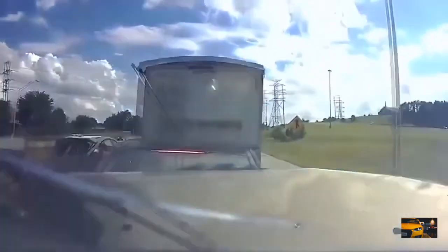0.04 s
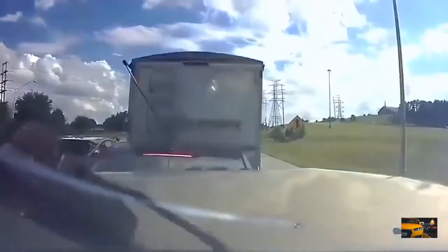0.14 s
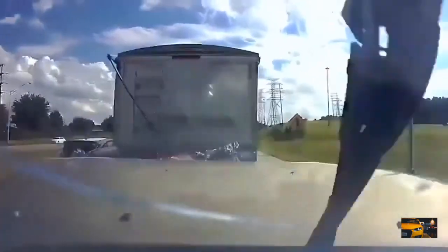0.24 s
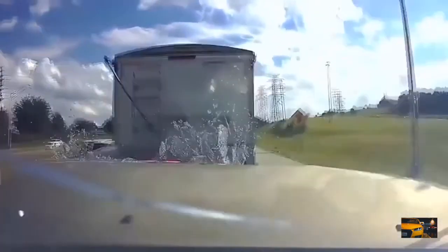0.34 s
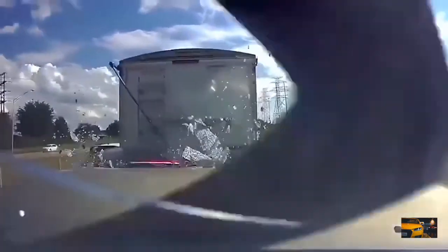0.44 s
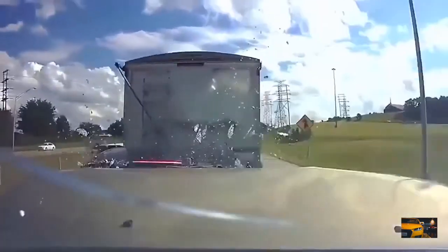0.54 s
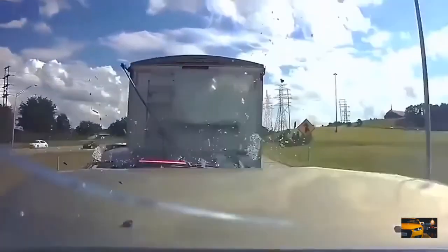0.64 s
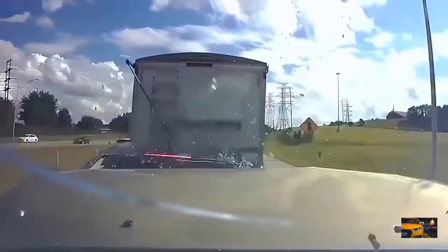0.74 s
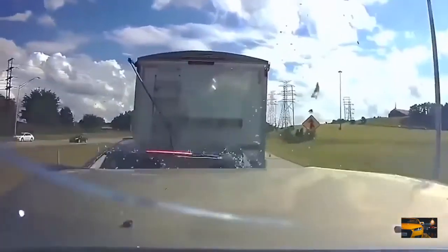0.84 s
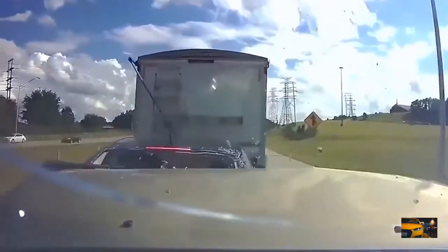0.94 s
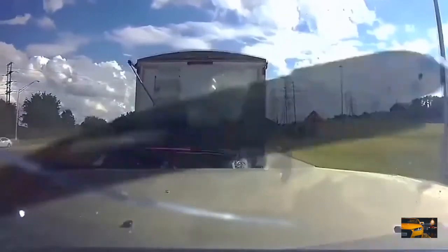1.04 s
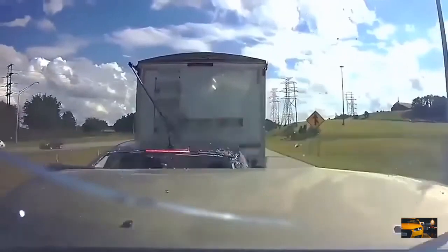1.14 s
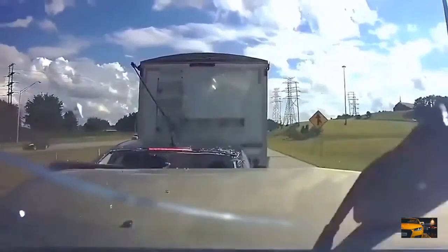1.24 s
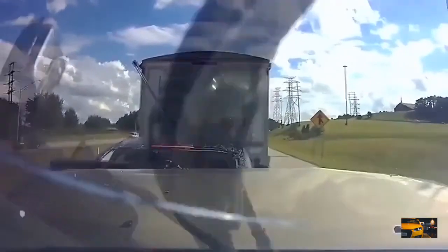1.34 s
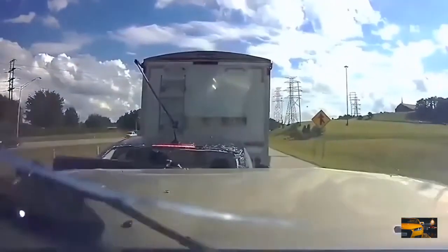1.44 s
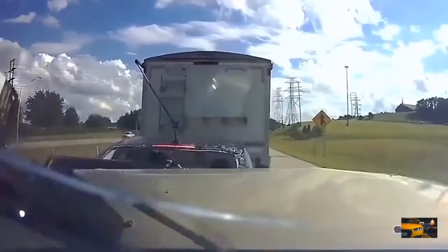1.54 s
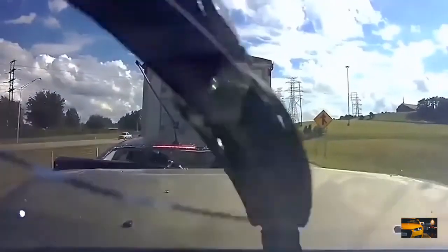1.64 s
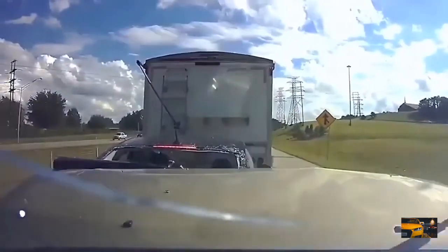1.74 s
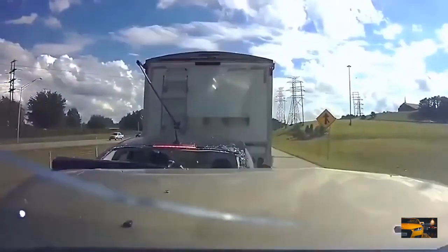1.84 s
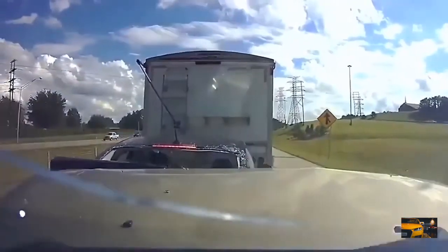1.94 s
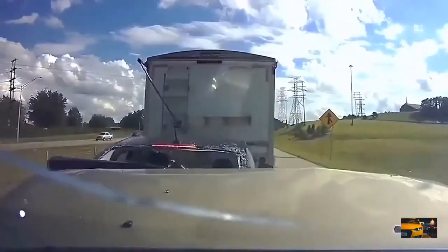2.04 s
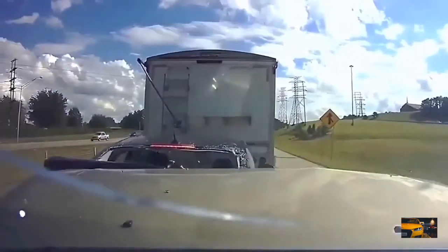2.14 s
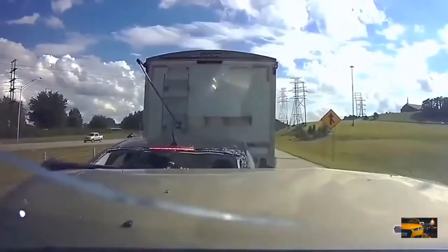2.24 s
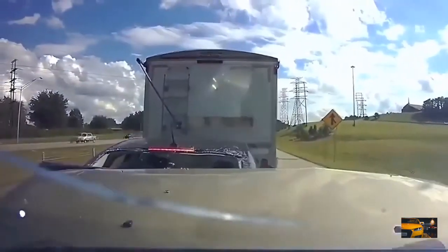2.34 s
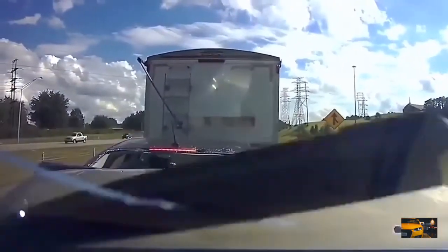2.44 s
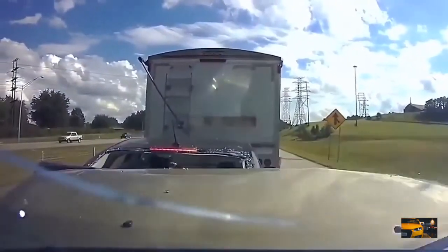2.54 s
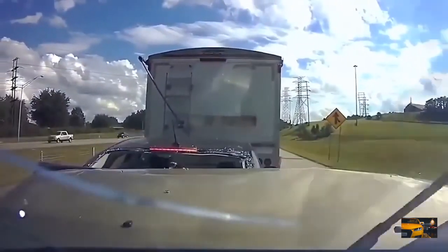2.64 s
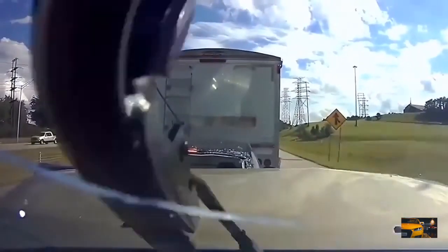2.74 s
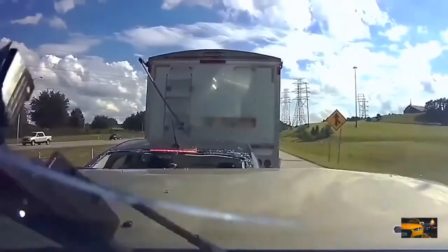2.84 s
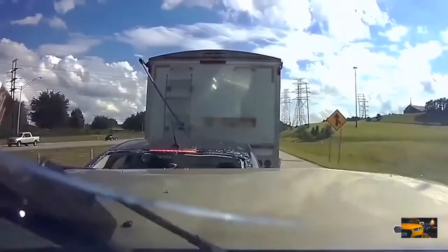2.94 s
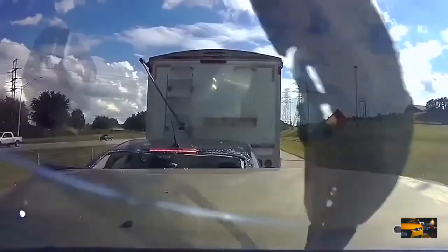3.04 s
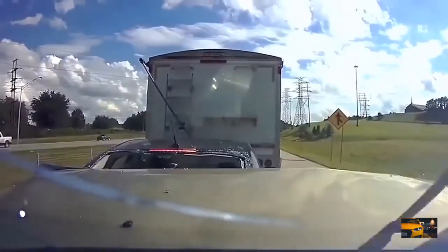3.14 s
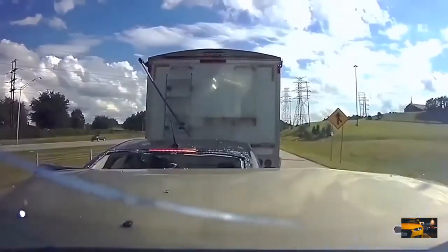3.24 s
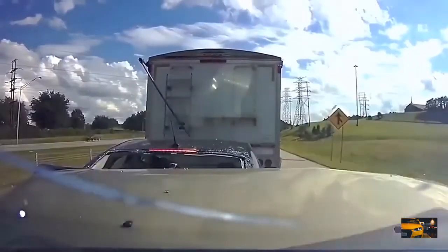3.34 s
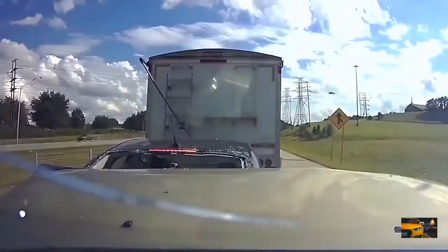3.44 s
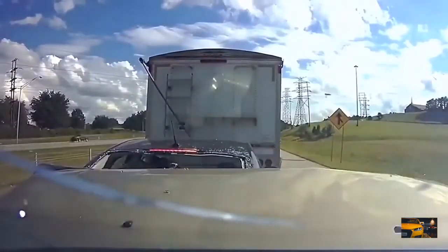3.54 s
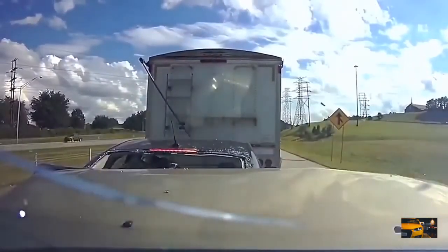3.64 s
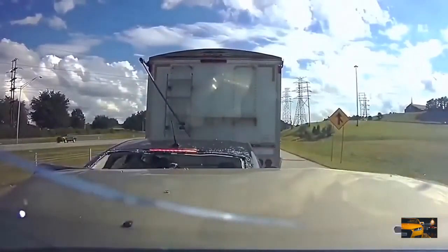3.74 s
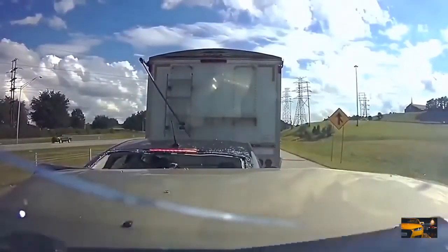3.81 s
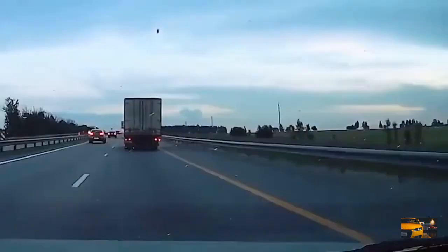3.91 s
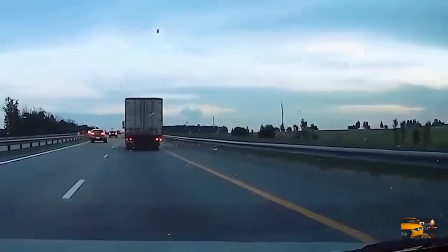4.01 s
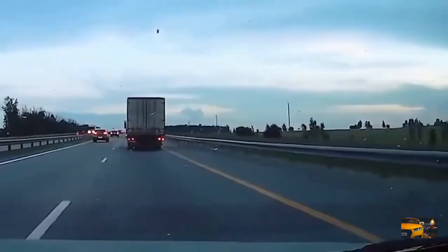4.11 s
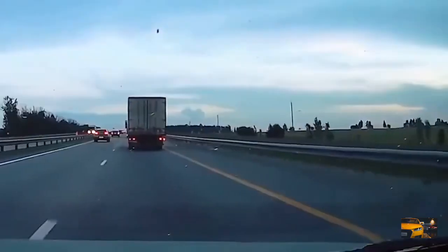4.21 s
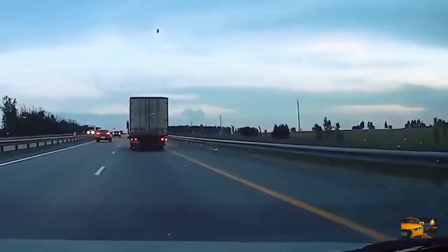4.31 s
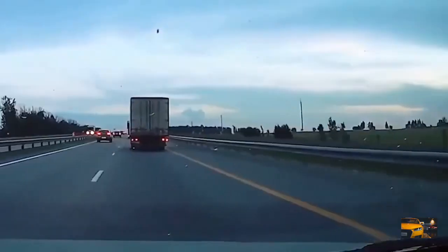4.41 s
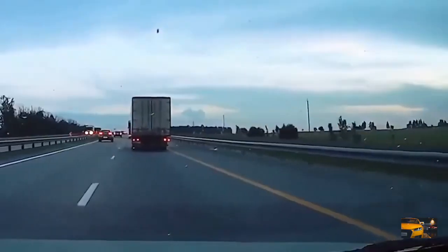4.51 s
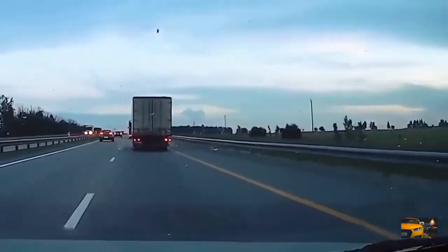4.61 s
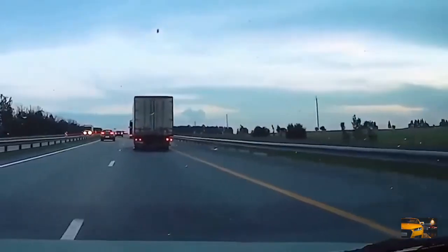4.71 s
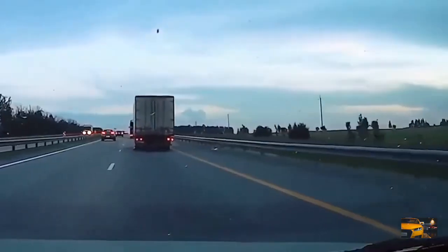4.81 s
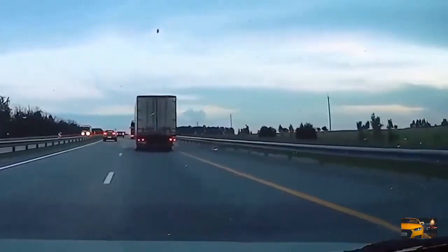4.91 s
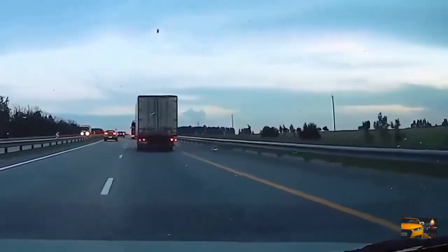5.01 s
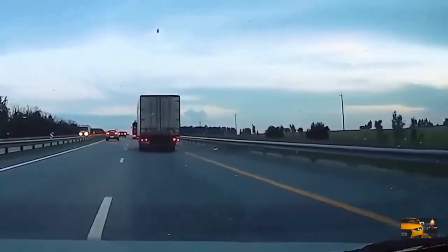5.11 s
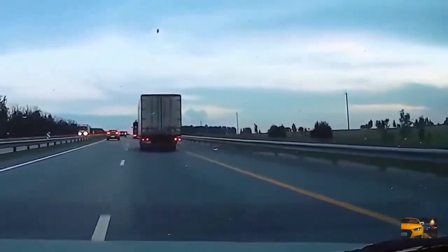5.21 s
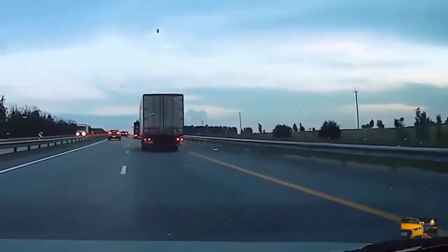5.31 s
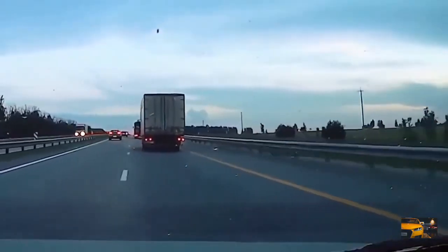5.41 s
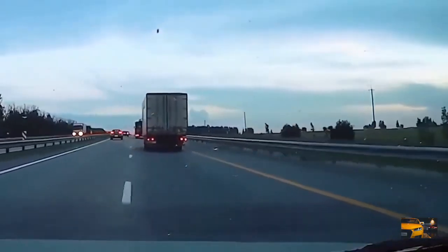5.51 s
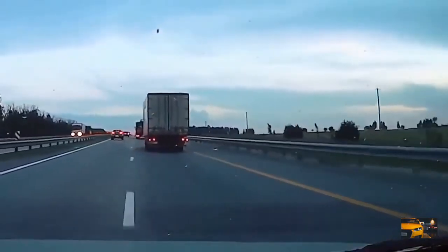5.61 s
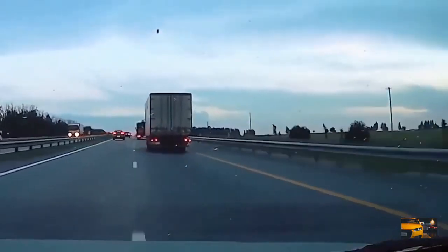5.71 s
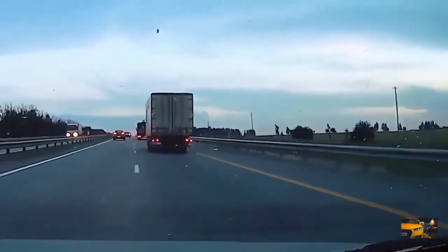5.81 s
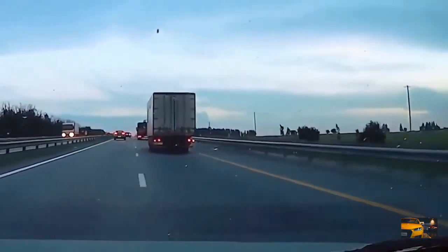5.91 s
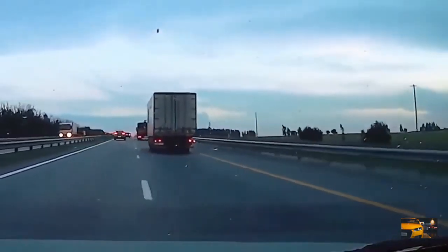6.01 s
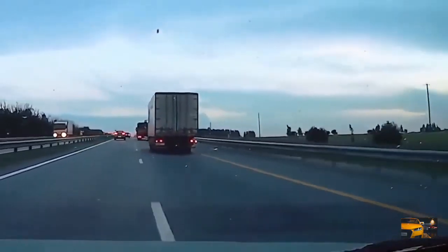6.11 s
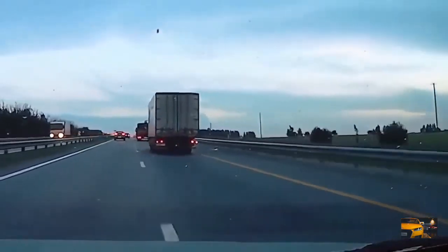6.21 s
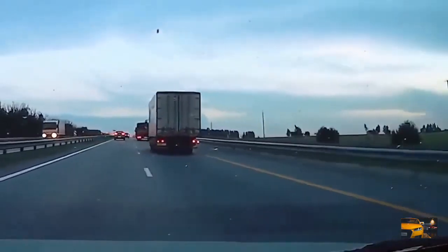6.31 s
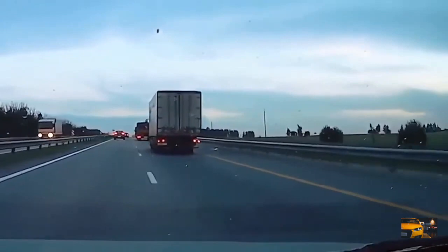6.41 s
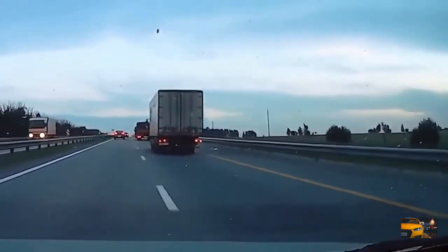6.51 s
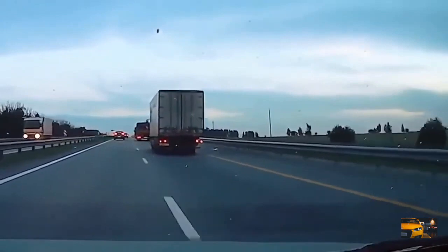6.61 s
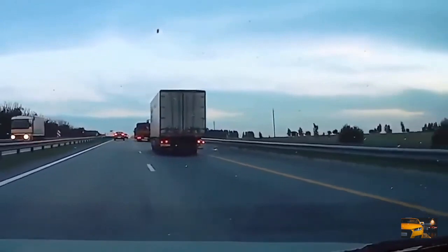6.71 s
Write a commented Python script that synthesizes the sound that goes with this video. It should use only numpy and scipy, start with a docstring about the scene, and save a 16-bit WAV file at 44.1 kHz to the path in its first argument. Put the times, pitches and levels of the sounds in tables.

```python
"""Tyres chirp, with a high partial above, in a shaking truck cab as it rams a car into the trailer ahead.
Panels crumple as patchy noise with ringing fractures, metal groans by stick-slip and squeals, glass sprays
as patchy bright noise with faint tiny rings, and the microphone overloads. Struck modes make bits settle
over the running engine's hum. A second scene then follows at once: a car cruises on a highway, with coloured
noise for tyre roar and air, wandering tones for the drone, and damped modes for the ticking trim."""
import sys
import numpy as np
from scipy import signal
from scipy.fft import rfft, irfft, next_fast_len
from scipy.io import wavfile
from scipy.ndimage import uniform_filter1d, map_coordinates

SR = 44100
rng = np.random.default_rng(int(sys.argv[2]) if len(sys.argv) > 2 else 0)


def waveform_to_disk(signal):
    """Save audio, clipped to [-1, 1], as 16-bit WAV at the path in sys.argv[1]."""
    frames = np.transpose(np.atleast_2d(signal))
    scaled = np.clip(frames, -1, 1) * 32767
    samples = np.round(scaled).astype(np.int16)
    wavfile.write(sys.argv[1], SR, samples)


N = 297734

CUT_S = 4.043  # the crash scene gives way to the highway scene
CAB_TOP_HZ, TOP_HZ = 7450, 15030  # upper band limits of the cab microphone and of the whole output
CEILING = .295  # amplitude at which the cab microphone overloads

# Highway: tyre roar spectrum. Each row: frequency in Hz, relative level in dB per Hz.
ROAD_SPECTRUM = [(11, -36), (18, -18), (27, -27), (53, -15), (70, -4.5), (130, -6), (219, -10), (318, -6.5),
                 (391, -12), (462, -8.5), (645, -15), (998, -14.5), (1150, -17.5), (2030, -24), (2600, -50),
                 (3380, -65), (5720, -120)]
# Air hiss spectrum. Each row: frequency in Hz, relative level in dB per Hz.
AIR_SPECTRUM = [(1300, -35), (2200, -3), (3000, -7.5), (3500, -11), (4600, -15.5), (5500, -16.5),
                (6800, -11), (7500, -20), (8500, -26.5), (10000, -29.5), (15000, -30.5)]
# Resonances of tyres and body. Each row: frequency in Hz, width in Hz, strength in dB.
TYRE_RESONANCES = [(139.6, 14, 6), (282, 67, 1), (990, 13, 2.5)]
# Tyre roar as the road surface changes. Each row: time in seconds, level in dB.
CRUISE_LEVELS = [(4.05, -36), (4.6, -36), (5.4, -35.5), (6.1, -36.5), (6.75, -35.5)]
HISS_DB = -25.5  # air hiss against the tyre roar
# Drone of engine and tyres. Each row: frequency in Hz, rms level in dB.
DRONE_TONES = [(39, -48.5), (78, -46.5), (194, -52), (233, -63.5), (292, -46.5), (322, -45)]
# Ticks of the dashboard trim. Each row: start in seconds, level in dB.
TRIM_TICKS = [(4.106, -54.5), (4.458, -57.5), (4.922, -47.5), (5.146, -54), (5.594, -57), (5.606, -44),
              (5.612, -45)]
# Noise spectrum of a trim tick. Each row: frequency in Hz, relative level in dB per Hz.
TICK_SPECTRUM = [(1200, -15), (2300, -4.5), (4000, -11.5), (6200, -1), (7300, -3.5), (9000, -16),
                 (15000, -32)]
# Ringing modes of the trim. Each row: frequency in Hz, level in dB, t60 in seconds.
TRIM_MODES = [(2315, -6, .075), (6080, -5, .056), (6530, -5, .059), (7120, -9, .054)]
CHATTER_PER_S, CHATTER_DB = 12, -57  # small plastic parts: ticks a second, greatest nominal level
# Modes of the chattering parts. Each row: frequency in Hz, level in dB, t60 in seconds.
CHATTER_MODES = [(6750, 0, .012), (7250, -1, .012)]

# Engine in the cab. Each row: frequency in Hz, rms level in dB.
ENGINE_TONES = [(57, -41.5)]
# A higher hum of the engine, before its fade-in. Each row: frequency in Hz, rms level in dB.
ENGINE_HUM_TONES = [(209, -56)]
# Rattling cab spectrum. Each row: frequency in Hz, relative level in dB per Hz.
RATTLE_SPECTRUM = [(35, -51), (60, -13), (86, -6.5), (178, -11), (215, -13), (340, -21), (380, -17.5),
                   (474, -26.5), (609, -22), (772, -22), (933, -22), (1080, -26.5), (1450, -29.5),
                   (1620, -38), (2600, -47), (3380, -56), (5720, -120)]
# Rustle of loose things. Each row: frequency in Hz, relative level in dB per Hz.
RUSTLE_SPECTRUM = [(1120, -38.5), (1900, -13), (2180, 2.5), (2570, -10.5), (2830, -2.5), (3210, -6.5),
                   (3490, -10), (4410, -15.5), (4970, -18.5), (5630, -16), (7400, -34), (9620, -56),
                   (16300, -120)]
RUSTLE_DB = -63  # before the cab's fade-in
# Hollow resonances of the cab. Each row: frequency in Hz, width in Hz, strength in dB.
HOLLOWS = [(375, 50, 1.5), (855, 150, -7.5), (1330, 11, 4), (1497, 37, 10), (2096, 100, 10.5),
           (2950, 250, -11)]
# The cab sways on its springs. Each row: start in seconds, length in seconds, level in dB.
SWAYS = [(1.8, 0.06, -36), (2.13, 0.029, -37), (2.48, 0.14, -35.5), (2.75, 0.021, -38), (3.17, 0.05, -31)]
SWAY_RISE_DB_PER_S, SWAY_FALL_DB_PER_S, RUMBLE_DB = 108, 66, -44
# Hollow booms in the cab. Each row: start in seconds, length in seconds, level in dB.
BOOMS = [(2.29, .04, -42.5), (2.6, .026, -45.5), (2.83, .06, -42), (3.12, .06, -46), (3.48, .09, -46.5)]
BOOM_RISE_DB_PER_S, BOOM_FALL_DB_PER_S = 117, 76
# The rattle fades from the end of the crash, and swinging objects stir it up again for a while
CALM_S, RATTLE_DB, RATTLE_FALL_DB_PER_S = 1.5, -44.5, 1.1
STIR_S, STIR_HOLD_S, STIR_DB, STIR_RISE_DB_PER_S, STIR_FALL_DB_PER_S = 2.71, 0.52, -53, 41, 26
# A thin drone comes and goes. Each row: start in seconds, length in seconds, level in dB before
# the cab's fade-in, then start, middle and end pitch in Hz.
WHINES = [(1.45, .52, -50, 408, 383, 388), (1.95, .3, -52, 392, 372, 362),
          (2.33, .35, -48.5, 382, 387, 378), (2.6, .58, -50.5, 368, 373, 357)]

# Things slide over the dashboard. Each row: time at full speed in seconds, length in seconds, level in dB.
SLIDES = [(2.21, .02, -64), (2.95, .06, -51.5), (3.55, .02, -62)]
SLIDE_RISE_DB_PER_S, SLIDE_FALL_DB_PER_S = 80, 95
# Sliding spectrum. Each row: frequency in Hz, relative level in dB per Hz.
DASH_SPECTRUM = [(500, -20), (860, 2), (1150, -1), (1470, 1), (1800, -10), (2400, -3), (2850, -4),
                 (3400, -12), (4000, -11.5), (4700, -15), (6000, -20), (7400, -26)]
# Sliding resonance before and after its climb. Each row: frequency in Hz, width in Hz, strength in dB.
SLIDE_RING = [(2410, 100, 6), (2790, 110, 3)]
SLIDE_CLIMB_S = (2.95, 2.99)  # start and end of the climb

# Knocks in the cab. Each row: start in seconds, thud level in dB, thud pitch in Hz, clack in dB over the thud.
KNOCKS = [(1.515, -36, 160, -13), (1.969, -34, 318, -15), (2.59, -35, 120, -16), (2.623, -33.5, 260, -8),
          (3.118, -34, 235, -20), (3.193, -48, 220, -3)]
# Modes of the struck dashboard. Each row: frequency in Hz, level in dB, t60 in seconds.
DASH_MODES = [(373, -1, 0.2), (576, -5.5, 0.22), (912, 6, .13), (1196, 1, 0.13), (1360, 1, 0.22),
              (1500, -16, 0.19), (2130, -13, .16), (2770, -8, 0.18), (3100, -12.5, 0.21)]
# Landing fragments. Each row: start in seconds, tap level in dB, bright tick in dB over the tap.
BITS = [(1.336, -45, 1), (1.530, -42, 3), (1.558, -52, 2), (1.613, -53, 6), (1.688, -57, 1),
        (1.745, -45, 5), (1.791, -58, 2), (1.831, -58, 3), (1.874, -52, -6), (1.927, -52, -6),
        (1.964, -57, 0), (2.092, -56, -8), (2.199, -59, 3), (2.243, -59, 1), (2.571, -52, -15),
        (3.052, -59, 9), (3.09, -62, 3), (3.192, -46.5, -9), (3.287, -66, 5), (3.538, -62, 4),
        (3.57, -61, -2)]
# Modes of a landing fragment. Each row: frequency in Hz, level in dB, t60 in seconds.
BIT_MODES = [(2780, 0, .06), (3170, 2, .15), (4730, -5, .06), (5860, -3, .09), (6150, -8, .045)]
# Resonances of the fragments. Each row: frequency in Hz, width in Hz, strength in dB.
BIT_RING = [(2800, 90, 1), (3100, 90, -4), (5840, 160, -4.5)]
TRICKLE_DB, TRICKLE_FALL_DB_PER_S = -57, 27  # glass crumbs: steady until CALM_S, then ever fainter

# Squeals: a tyre chirp's high partial, then steel on steel. Each row: start in seconds, length in seconds,
# level in dB, pitch in Hz.
SQUEALS = [(.04, .24, -54, 2170), (.642, .07, -39.5, 2043), (.643, .028, -43, 5437),
           (.643, .028, -43, 5728), (.682, .028, -44, 4820), (.672, .025, -47, 3790),
           (.918, .08, -38, 2054), (1.0, .08, -46, 2062), (.96, .045, -45.5, 3252), (1.045, .04, -46, 3242),
           (.965, .125, -49.5, 5230)]
# Bending metal groans. Each row: start and length in seconds, level in dB, start, middle and end pitch in Hz.
GROANS = [(.72, .03, -22, 345, 385, 425), (.745, .05, -29, 470, 495, 500), (.945, .07, -30, 360, 410, 345),
          (1.185, .08, -29.5, 375, 415, 405), (1.262, .04, -37, 395, 398, 396),
          (1.57, .2, -49, 640, 632, 595)]
# Metal rasps. Each row: start and length in seconds, level in dB, start, middle and end pitch in Hz.
SCRAPES = [(.972, .14, -30, 300, 385, 290)]
# A bending panel's resonance glides. Each row: start and length in seconds, level in dB, start, middle
# and end pitch in Hz.
BENDS = [(.533, .025, -24, 1180, 1070, 1030), (.563, .028, -25, 850, 950, 1070),
         (.898, .028, -34, 1450, 1400, 1310), (.938, .037, -33, 1150, 850, 760),
         (.982, .03, -31, 660, 675, 720), (1.012, .11, -33, 830, 880, 810),
         (1.019, .048, -29, 1175, 1205, 1160), (1.067, .025, -33, 1410, 1350, 1280),
         (1.193, .028, -34, 940, 980, 1010)]
# Tyres chirp. Each row: start and length in seconds, level in dB, start, middle and end pitch in Hz.
CHIRPS = [(.052, .058, -35, 955, 948, 958), (.115, .075, -39, 950, 964, 972),
          (.17, .075, -35, 962, 942, 935), (1.325, .109, -41, 966, 972, 945),
          (2.03, .069, -46, 927, 930, 935)]

# Jolts rock the cab. Each row: start in seconds, level in dB, frequency in Hz, hold in seconds.
JOLTS = [(.107, -15, 33, .015), (.2, -21, 36, .02), (.412, -9, 31, .03), (.446, -15, 88, .035),
         (.510, -7, 39, .018), (.583, -7, 39, .032), (.950, -16, 125, .018)]
JOLT_FALL_DB_PER_S = 800
# Buckling panels. Each row: start in seconds, crunch level in dB, boom in dB over it, crack in dB over it,
# t60 of crunch and crack in seconds.
BLOWS = [(.135, -47, 22, -10, .22), (.29, -35, -6, -14, .06), (.383, -27, -3, -24, .06),
         (.444, -18, -6, -24, .1), (.459, -24, -2, -9, .07), (.482, -27, -3, -5, .09),
         (.493, -22, -10, -14, .06), (.503, -27, -6, -7, .07), (.516, -22, -8, -8, .06),
         (.539, -17, -13, -10, .14), (.556, -19, -12, -16, .08), (.569, -24, -12, -4, .1),
         (.606, -26, -10, -7, .05), (.62, -29, -10, -6, .07), (.657, -25, -14, -10, .09),
         (.685, -23, -10, -12, .06), (.707, -16, -10, -8, .11), (.727, -17, -18, -17, .13),
         (.79, -33, -10, -1, .07), (.814, -32, -10, -2, .06), (.948, -33, 9, -5, .2),
         (1.001, -25, -8, -12, .07), (1.032, -26, -14, -12, .08), (1.106, -38, -10, 3, .04),
         (1.14, -34, -2, -7, .15), (1.203, -27, -11, -16, .14), (1.232, -26, -9, -14, .09),
         (1.255, -32, -14, -14, .07), (1.396, -33, -20, -14, .1)]

# The car folds in stages. Each row: start in seconds, length in seconds, then level in dB of crumpling panels,
# spraying glass and flexing shell.
FOLDS = [(-0.01, 0.23, -41, -44, -32), (0.418, .04, -38.5, -52, -37.5), (0.472, 0.059, -28, -34.5, -19),
         (0.664, 0.042, -33, -36.5, -28), (0.792, 0.044, -39, -42.5, -38.5),
         (0.925, 0.091, -39, -38.5, -29.5), (1.11, 0.11, -40, -41.5, -35.5), (1.355, 0.032, -45, -61, -48)]
FOLD_RISE_DB_PER_S, FOLD_FALL_DB_PER_S = 172.5, 62
GLASS_RISE_DB_PER_S, GLASS_FALL_DB_PER_S, GLASS_LAG_S = 206, 78, 0.017
SHELL_RISE_DB_PER_S, SHELL_FALL_DB_PER_S, SHELL_LEAD_S = 129.5, 112.5, 0.032
# The cab shakes hardest at the main impact
SHAKE_S, SHAKE_HOLD_S, SHAKE_DB, SHAKE_RISE_DB_PER_S, SHAKE_FALL_DB_PER_S = 0.59, 0.062, -20, 11.5, 29
# Shaking cab spectrum. Each row: frequency in Hz, relative level in dB per Hz.
SHAKE_SPECTRUM = [(9, -35), (15, -6.5), (30, -7), (42, 2.5), (55, -1), (75, -8), (110, -10), (200, -36),
                  (350, -88)]
# Flexing body shell spectrum. Each row: frequency in Hz, relative level in dB per Hz.
SHELL_SPECTRUM = [(60, -22), (100, -5), (160, -3), (250, -5), (330, -14.5), (500, -21.5), (900, -34.5),
                  (2000, -60.5)]
# Crumpling panel spectrum. Each row: frequency in Hz, relative level in dB per Hz.
PANEL_SPECTRUM = [(150, -44.5), (300, -11), (400, -0.5), (560, 0), (650, 3), (830, 1), (1050, 0.5),
                  (1370, 0), (1640, -16.5), (2100, -16.5), (2600, -19), (3400, -42)]
# Snaps of metal and plastic. Each row: frequency in Hz, relative level in dB per Hz.
SNAP_SPECTRUM = [(200, -29.5), (450, -6), (900, 8.5), (1400, 1.5), (1750, -15.5), (2200, -7.5), (3200, -14),
                 (4000, -29.5), (6000, -9.5), (7400, -18.5)]
SNAP_DB = -8  # snaps against the panels
# Spraying glass spectrum. Each row: frequency in Hz, relative level in dB per Hz.
GLASS_SPECTRUM = [(1120, -9), (1900, -3), (2100, 1.5), (2530, -6), (3280, -5), (3570, -11.5), (3850, -10),
                  (4560, -12), (4690, -11.5), (5570, -9.5), (7400, -20.5), (9620, -45.5), (16300, -120)]


def amp(db):
    """Amplitude ratio: 20 dB for each factor of ten."""
    return 10 ** (np.asarray(db) / 20)


def unit(x):
    """Normalization by mean power: scale to rms 1."""
    return x / np.sqrt(np.mean(x ** 2) + 1e-20)


def clock(seconds):
    """Uniform sampling: the sample times of a stretch."""
    return np.arange(int(seconds * SR)) / SR


def add(track, s, sound):
    """Superposition: mix a sound in at time s."""
    part = track[max(0, round(s * SR)):][:len(sound)]
    part += sound[:len(part)]


def ramp(start, end):
    """Linear growth from 0 to 1 between two times."""
    return np.clip((np.arange(N) / SR - start) / max(end - start, 1 / SR), 0, 1)


def surge(s, length, rise, fall):
    """Exponential growth and decay about a hold at gain 1 from time s; slopes in dB per second."""
    t = np.arange(N) / SR - s
    return amp(rise * np.minimum(t, 0) - fall * np.maximum(t - length, 0))


def surges(rows, rise, fall):
    """Power addition: the joint gain of overlapping (start s, length s, dB) surges."""
    return np.sqrt(sum((amp(db) * surge(s, length, rise, fall)) ** 2 for s, length, db in rows))


def swell(length, edge):
    """Tapered stroke: fades in and out over a share of its length."""
    return signal.windows.tukey(int(length * SR), np.clip(edge, 0, 1))


def wobble(rate, size=N):
    """Slow random fluctuation: a smooth curve through random knots, rate a second."""
    knots = rng.standard_normal(int(size * rate / SR) + 4)
    return map_coordinates(knots, [np.arange(size) * rate / SR])


def filtered(x, response):
    """Linear filtering: multiply the spectrum of x by a response of frequency."""
    size = next_fast_len(len(x) + SR // 4)
    return irfft(rfft(x, size) * response(np.fft.rfftfreq(size, 1 / SR)), size)[:len(x)]


def colour(x, points, peaks=()):
    """Spectral shaping: x takes a (Hz, dB) slope with second-order resonances on top; rms 1."""
    hz, db = np.transpose(points)

    def response(f):
        slope = amp(np.interp(np.log(f + 1), np.log(hz), db))
        resonance = 1 + sum(amp(g) * 1j * f * w / (c * c - f * f + 1j * f * w) for c, w, g in peaks)
        return slope * resonance

    return unit(filtered(x, response))


def rush(patchy_db, size=N):
    """Modulated turbulence: noise whose strength drifts in patches of time and pitch."""
    z = signal.stft(rng.standard_normal(size), nperseg=1024)[2]
    field = uniform_filter1d(rng.standard_normal(z.shape), size=5, axis=0)
    field = uniform_filter1d(field, size=5, axis=1)
    return unit(signal.istft(z * amp(patchy_db * unit(field)))[1][:size])


def shards(rate, spread_db, t60, low_hz, high_hz):
    """Random fracture: a hail of small breaks until CUT_S, each ringing briefly at its own pitch."""
    t = clock(.035)
    when, pitch, size, life = rng.random((int(rate * CUT_S), 4)).T[:, :, None]
    hz = low_hz + (high_hz - low_hz) * pitch
    decay_db = -60 * t / (t60 * (.5 + life))  # each life is 0.5 to 1.5 times t60
    rings = amp(spread_db * size ** 3 + decay_db) * np.sin(2 * np.pi * hz * t)
    index = (when * CUT_S * SR).astype(int) + np.arange(len(t))
    return unit(np.bincount(index.ravel(), rings.ravel(), N)[:N])


def burst(points, t60, attack, peaks=()):
    """Heavily damped impact: coloured noise that dies away exponentially."""
    t = clock(.4)
    noise = colour(rng.standard_normal(len(t)), points, peaks)
    return noise * amp(-60 * t / t60) * (1 - np.exp(-t / attack))


def ring(modes, scatter_db=2, attack=0.00054):
    """Modal vibration: damped sines, a little different in pitch and level at every blow."""
    t = clock(.4)
    tones = 0
    for hz, db, t60 in modes:
        decay = amp(db + rng.normal(0, scatter_db) - 60 * t / t60)
        tones = tones + decay * np.sin(2 * np.pi * hz * (1 + rng.normal(0, .01)) * t)
    return tones * (1 - np.exp(-t / attack))


def stick_slip(rows, overtones_db, jitter, rough_db):
    """Stick-slip friction: an unsteady slip rate glides through three pitches, with harmonics."""
    out = np.zeros(N)
    for s, length, db, *hz in rows:
        stroke = swell(length, edge=0.84)
        size = len(stroke)
        pitch = np.polyval(np.polyfit([0, .5, 1], hz, 2), np.linspace(0, 1, size))
        phase = 2 * np.pi * np.cumsum(pitch * (1 + jitter * wobble(300, size))) / SR
        tone = 0
        for k, overtone_db in enumerate(overtones_db, 1):
            tone = tone + amp(overtone_db + rough_db * wobble(144, size)) * np.sin(k * phase)
        add(out, s, amp(db) * stroke * unit(tone))
    return out


def hum(lines, drift, waver_db, rate):
    """Periodic excitation: machine tones that wander a little in pitch and strength."""
    out = np.zeros(N)
    for hz, db in lines:
        strength = amp(waver_db * wobble(rate))
        phase = 2 * np.pi * np.cumsum(hz * (1 + drift * wobble(rate))) / SR
        out += amp(db) * unit(strength * np.sin(phase))
    return out


def highway():
    """Broadband rolling noise through body resonances, with engine drone, air hiss and modal trim ticks."""
    surface = amp(np.interp(np.arange(N) / SR, *np.transpose(CRUISE_LEVELS)))
    roar = colour(rush(patchy_db=0.76), ROAD_SPECTRUM, TYRE_RESONANCES)
    hiss = amp(HISS_DB) * colour(rush(patchy_db=1.2), AIR_SPECTRUM)
    out = surface * (roar + hiss)
    for s, db in TRIM_TICKS:
        tick = burst(TICK_SPECTRUM, t60=0.042, attack=0.00039) + ring(TRIM_MODES)
        add(out, s, amp(db) * tick)
    span = N / SR - CUT_S
    # chatter falls at random times, up to 10 dB below its nominal level
    for when, size_db in rng.random((int(CHATTER_PER_S * span), 2)) * [span, -10]:
        add(out, CUT_S + when, amp(CHATTER_DB + size_db) * ring(CHATTER_MODES))
    return out + hum(DRONE_TONES, drift=0.00794, waver_db=3.0, rate=9)


def cab():
    """Forced and resonant vibration: the engine runs on while the cab sways, booms, whines and rattles."""
    rock = np.hypot(amp(RUMBLE_DB), surges(SWAYS, SWAY_RISE_DB_PER_S, SWAY_FALL_DB_PER_S))
    stir = amp(STIR_DB) * surge(STIR_S, STIR_HOLD_S, STIR_RISE_DB_PER_S, STIR_FALL_DB_PER_S)
    rattle = np.hypot(stir, amp(RATTLE_DB) * surge(CALM_S, 0, 0, RATTLE_FALL_DB_PER_S))
    boom = surges(BOOMS, BOOM_RISE_DB_PER_S, BOOM_FALL_DB_PER_S)
    rumble = colour(rng.standard_normal(N),
                    [(10, -18.0), (22, 3.0), (40, -12.5), (70, -12.0), (120, -29.5), (250, -99.5)])
    body = colour(rush(patchy_db=1.5), RATTLE_SPECTRUM, HOLLOWS[1:])
    rustle = colour(rng.standard_normal(N), RUSTLE_SPECTRUM)
    cavity = colour(rush(patchy_db=2.0), [(150, -49), (195, -4.0), (210, 3.5), (230, -7.5),
                                          (260, -12.0), (320, -40.0), (600, -101)])
    out = rock * rumble + rattle * body + amp(RUSTLE_DB) * rustle + boom * cavity
    out += stick_slip(WHINES, [0], jitter=.035, rough_db=3.5)
    out += hum(ENGINE_HUM_TONES, drift=.02, waver_db=4, rate=9)
    # all but the low engine tone fades in during the crash
    return out * ramp(0.24, 1.6) + hum(ENGINE_TONES, drift=0.032, waver_db=1.5, rate=5.6)


def sliding():
    """Granular friction: loose things scrape over the dashboard, and a resonance climbs in pitch."""
    fractures = shards(rate=2500, spread_db=7, t60=.03, low_hz=600, high_hz=7400)
    grains = rush(patchy_db=2) + amp(-2) * fractures
    slow, fast = (colour(grains, DASH_SPECTRUM, [peak]) for peak in SLIDE_RING)
    share = ramp(*SLIDE_CLIMB_S)
    return surges(SLIDES, SLIDE_RISE_DB_PER_S, SLIDE_FALL_DB_PER_S) * (slow * (1 - share) + fast * share)


def settling():
    """Modal impact: glass crumbs trickle, loose objects knock and fragments ring as they land."""
    hail = shards(rate=2000, spread_db=8.5, t60=0.0023, low_hz=1490, high_hz=7440)
    crumbs = colour(hail, GLASS_SPECTRUM, BIT_RING)
    out = amp(TRICKLE_DB) * surge(CALM_S, 0, 0, TRICKLE_FALL_DB_PER_S) * crumbs
    for s, db, hz, clack_db in KNOCKS:
        thud = ring([(hz, 0, .2)], scatter_db=2.5)
        thud += amp(-8.0) * burst([(80, -21.0), (200, -1.5), (290, -7.0), (450, -11.0), (1000, -58.5)],
                                  t60=0.49, attack=0.0014)
        clack = amp(-6.0) * ring(DASH_MODES, attack=0.0023)
        clack += amp(0.5) * burst([(300, -14.0), (600, 14.0), (1400, -3.0), (1750, -8.0), (2200, -3.5),
                                   (3000, -10.0), (4500, -47.0)], t60=0.21, attack=.001)
        add(out, s, amp(db) * (thud + amp(clack_db) * clack))
    for s, db, tick_db in BITS:
        tap = amp(2.0) * burst([(500, -3.5), (1500, 1.0), (3000, -6.0), (5000, -12.5), (7400, -27.5)],
                               t60=0.048, attack=.0004, peaks=BIT_RING)
        tap += amp(-11.5) * ring(BIT_MODES)
        tick = burst([(2000, -18.5), (4500, 3), (6000, 1), (7400, -9.0)],
                     t60=0.016, attack=.0003, peaks=BIT_RING)
        add(out, s, amp(db) * (tap + amp(tick_db) * tick))
    return out


def friction():
    """Self-excited vibration: tyres chirp with a high partial, steel squeals, bent metal groans and rasps."""
    out = np.zeros(N)
    for s, length, db, hz in SQUEALS:
        stroke = swell(length, edge=0.21)
        size = len(stroke)
        phase = 2 * np.pi * np.cumsum(hz * (1 + .004 * wobble(150, size))) / SR
        tone = unit(amp(3.5 * wobble(70, size)) * np.sin(phase))
        add(out, s, amp(db) * stroke * tone)
    out += stick_slip(GROANS, [4, -10, -14, -16], jitter=.035, rough_db=3)
    out += stick_slip(SCRAPES, [-3, 0, -2, -8, -24, -21], jitter=.02, rough_db=3.5)
    out += stick_slip(BENDS, [0], jitter=.012, rough_db=2.5)
    return out + stick_slip(CHIRPS, [0, -24, -23], jitter=.006, rough_db=1.8)


def jolts():
    """Damped oscillation: each heavy jolt rocks the cab at a low frequency, holds, then dies fast."""
    out, t = np.zeros(N), clock(.5)
    for s, db, hz, hold in JOLTS:
        gain = amp(db - JOLT_FALL_DB_PER_S * np.maximum(t - hold, 0))
        add(out, s, gain * np.sin(2 * np.pi * hz * t))
    return out


def impacts():
    """Sudden buckling: each panel booms low, crunches in the middle and cracks in the treble."""
    out = np.zeros(N)
    for s, db, boom_db, crack_db, t60 in BLOWS:
        boom = burst([(40, -39.0), (110, 3.5), (300, -15.5), (700, -47.0), (2000, -70.0)],
                     t60=0.28, attack=0.0013)
        crunch = burst([(150, -9.0), (380, 11.0), (1300, 1.5), (1750, -9.5), (3000, -21.0), (7000, -53.5)],
                       t60=t60, attack=0.0019, peaks=HOLLOWS)
        crack = burst([(1000, -30), (2300, -4), (3000, 0), (4200, -5), (6000, -4), (7400, -15)],
                      t60=t60, attack=0.0005)
        add(out, s, amp(db) * (amp(boom_db) * boom + crunch + amp(crack_db) * crack))
    return out


def crumpling():
    """Progressive collapse: the cab shakes; by stages the shell flexes, panels fold and glass sprays."""
    s, length, panel_db, glass_db, shell_db = np.transpose(FOLDS)
    flex = surges(zip(s - SHELL_LEAD_S, length, shell_db), SHELL_RISE_DB_PER_S, SHELL_FALL_DB_PER_S)
    fold = surges(zip(s, length, panel_db), FOLD_RISE_DB_PER_S, FOLD_FALL_DB_PER_S)
    spray = surges(zip(s + GLASS_LAG_S, length, glass_db), GLASS_RISE_DB_PER_S, GLASS_FALL_DB_PER_S)
    shake = amp(SHAKE_DB) * surge(SHAKE_S, SHAKE_HOLD_S, SHAKE_RISE_DB_PER_S, SHAKE_FALL_DB_PER_S)

    rumble = colour(rush(patchy_db=-7), SHAKE_SPECTRUM)
    shell = colour(rush(patchy_db=3.5), SHELL_SPECTRUM)
    fits = unit(amp(1.5 * wobble(220)))  # folding and spraying fluctuate together
    creases = shards(rate=540, spread_db=9.5, t60=0.13, low_hz=281.6, high_hz=1606)
    panels = colour(rush(patchy_db=-1.5) + amp(-6.0) * creases, PANEL_SPECTRUM, HOLLOWS)
    breaks = shards(rate=900, spread_db=16, t60=.011, low_hz=400, high_hz=4200)
    snaps = colour(breaks, SNAP_SPECTRUM)
    # glass is mainly patchy noise, with faint tiny rings
    splinters = shards(rate=1200, spread_db=6, t60=0.0078, low_hz=1850, high_hz=7340)
    glass = colour(rush(patchy_db=3.5) + amp(-16.5) * splinters, GLASS_SPECTRUM)
    folding = fold * unit(panels + amp(SNAP_DB) * snaps)
    return shake * rumble + flex * shell + fits * (folding + spray * glass)


def splice(before, after):
    """Linear crossfade: one scene gives way to the other within 4 ms."""
    share = ramp(CUT_S - .002, CUT_S + .002)
    return before * (1 - share) + after * share


def scene():
    """Superposition of the collision's sources, then the highway."""
    crash = cab() + sliding() + settling() + friction() + jolts() + impacts() + crumpling()
    return splice(crash, highway())[None]


def record(dry, stopband_db=-17, fizz_db=-13):
    """Saturation: the narrow cab microphone clips softly and fizzes; the highway one reaches higher."""
    narrow = filtered(dry[0] * ramp(0, .003), lambda hz: hz < CAB_TOP_HZ)
    clipped = narrow / (1 + np.abs(narrow / CEILING) ** 3.5) ** (1 / 3.5)
    # distortion products above the band are weakened
    dulled = filtered(clipped, lambda hz: np.where(hz < CAB_TOP_HZ, 1, amp(stopband_db)))
    # fast-moving samples above the ceiling raise a noise
    overload = uniform_filter1d(np.abs(np.gradient(narrow)) * (np.abs(narrow) > CEILING), size=2500)
    fizz = amp(fizz_db) * overload * rng.standard_normal(N)
    return filtered(splice(dulled + fizz, dry[0]), lambda hz: hz < TOP_HZ)[None]


dry = scene()
out = record(dry)
waveform_to_disk(out)
```